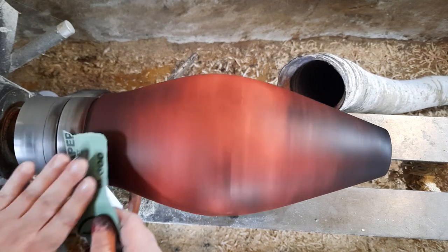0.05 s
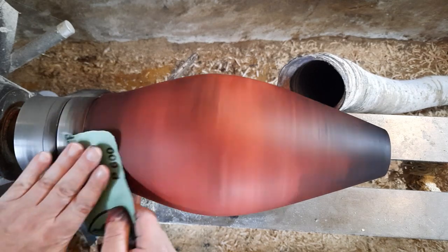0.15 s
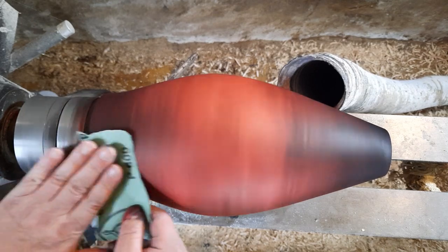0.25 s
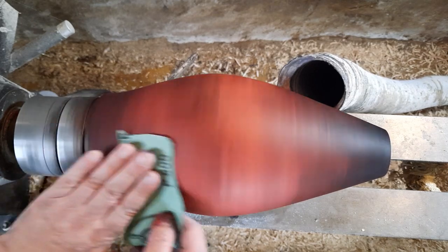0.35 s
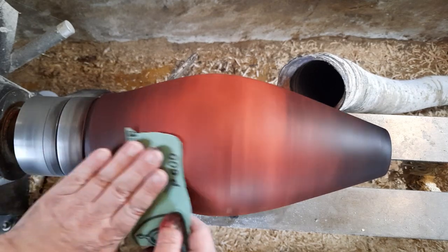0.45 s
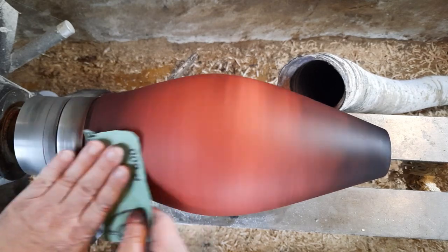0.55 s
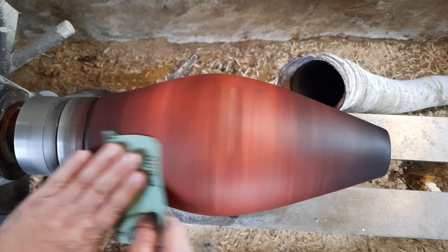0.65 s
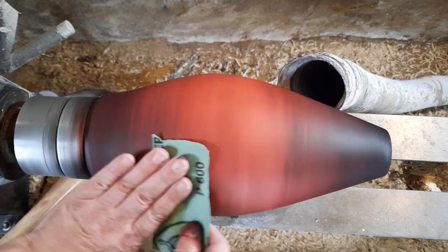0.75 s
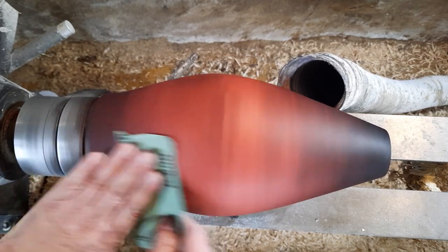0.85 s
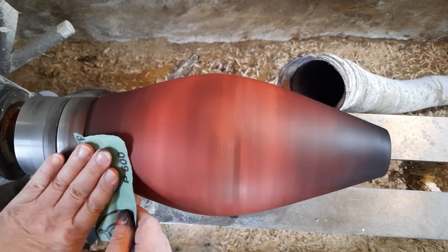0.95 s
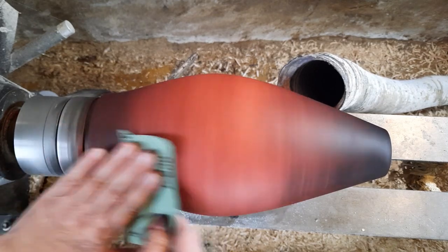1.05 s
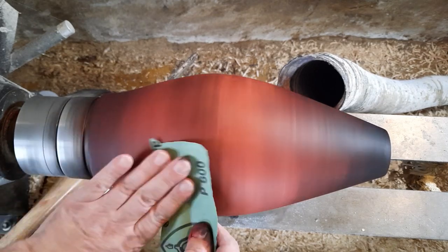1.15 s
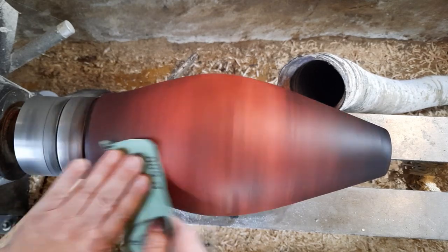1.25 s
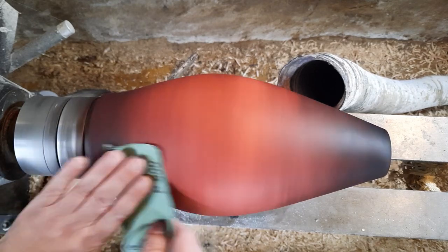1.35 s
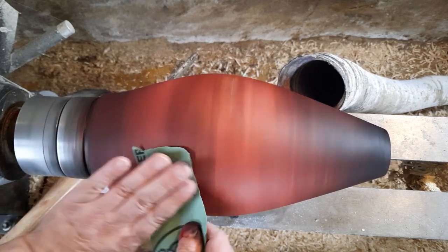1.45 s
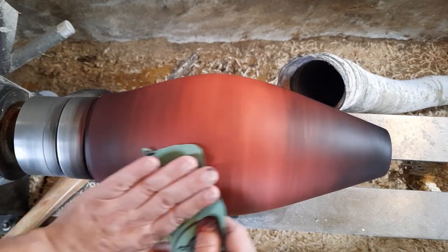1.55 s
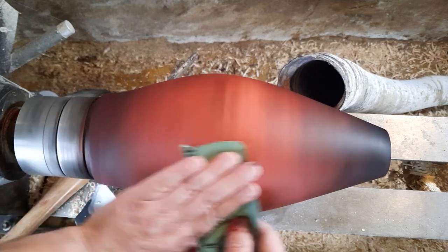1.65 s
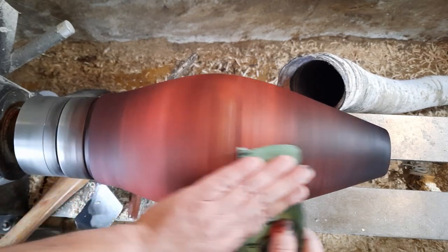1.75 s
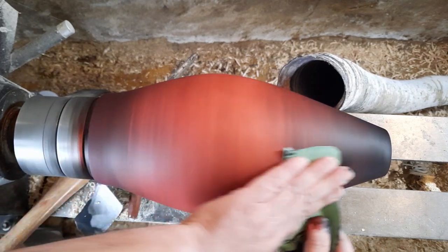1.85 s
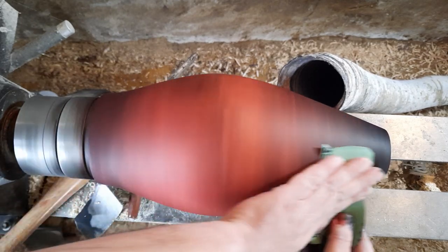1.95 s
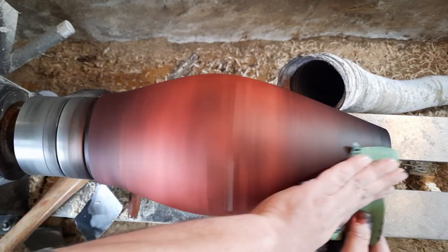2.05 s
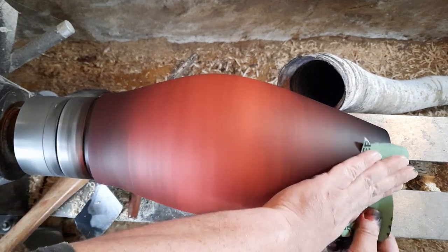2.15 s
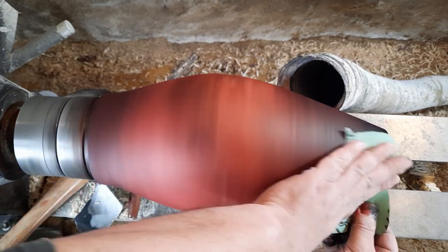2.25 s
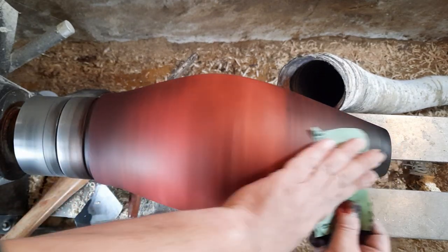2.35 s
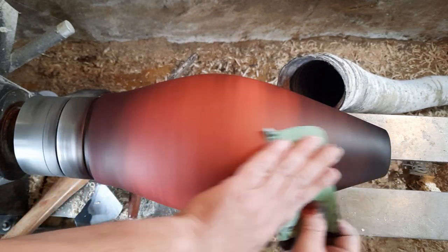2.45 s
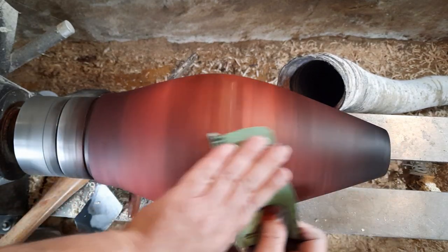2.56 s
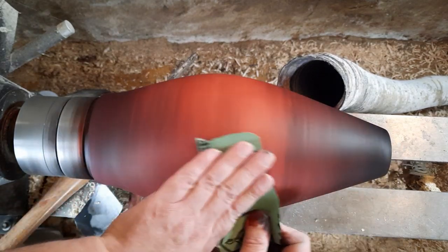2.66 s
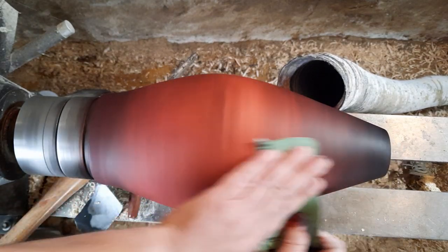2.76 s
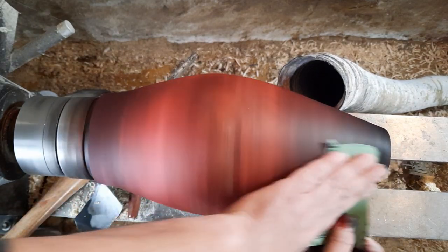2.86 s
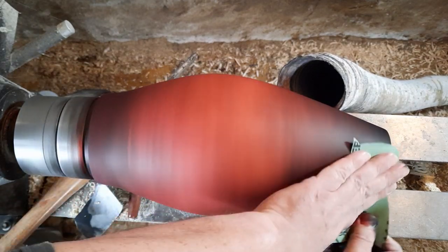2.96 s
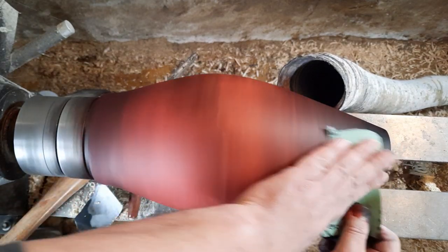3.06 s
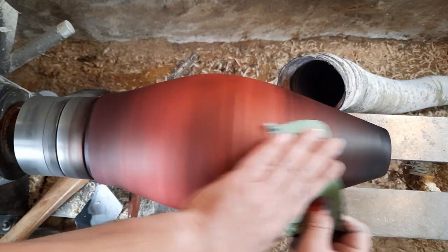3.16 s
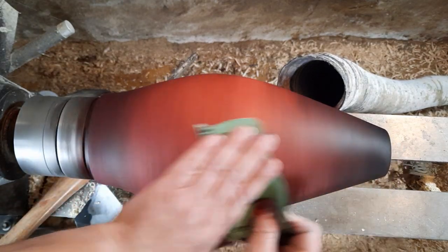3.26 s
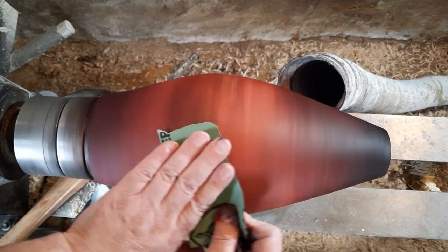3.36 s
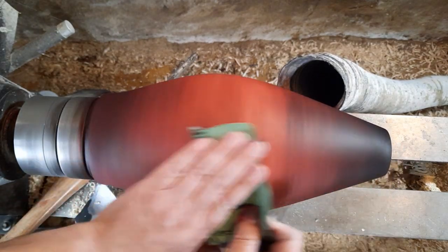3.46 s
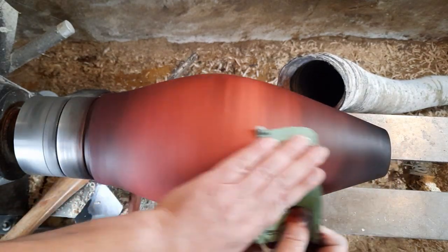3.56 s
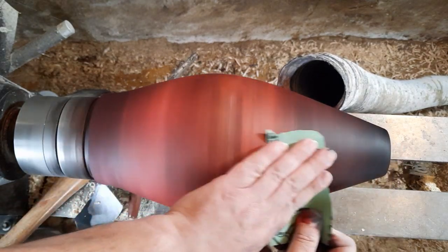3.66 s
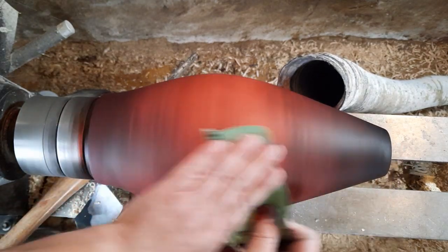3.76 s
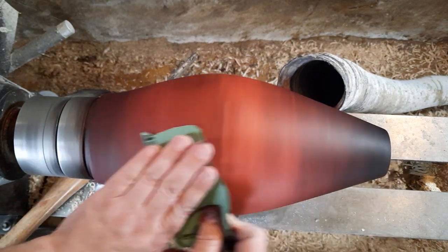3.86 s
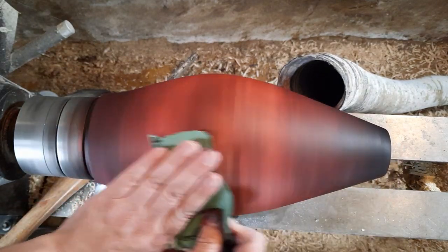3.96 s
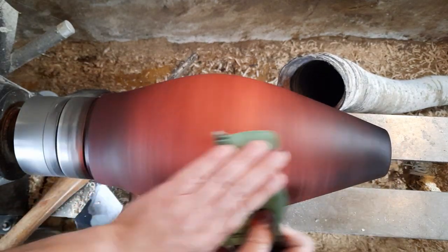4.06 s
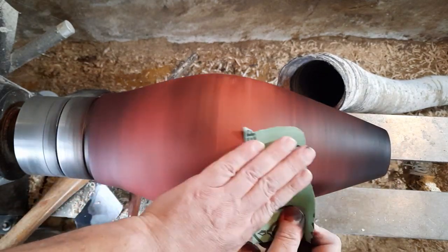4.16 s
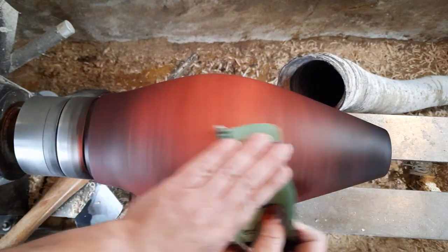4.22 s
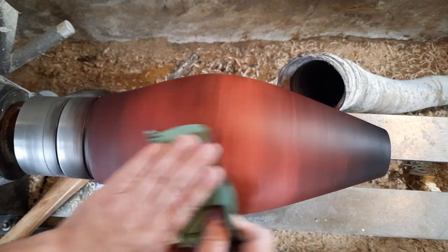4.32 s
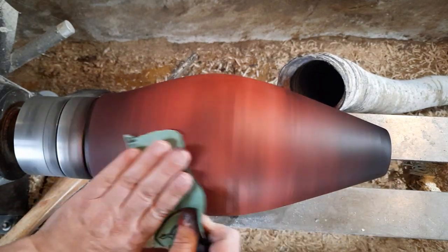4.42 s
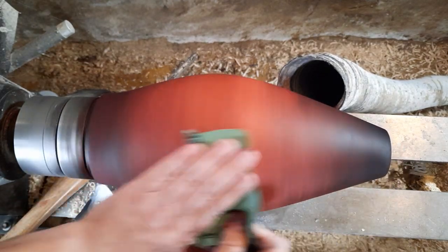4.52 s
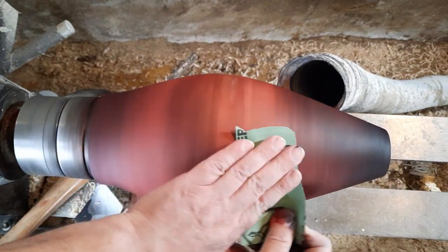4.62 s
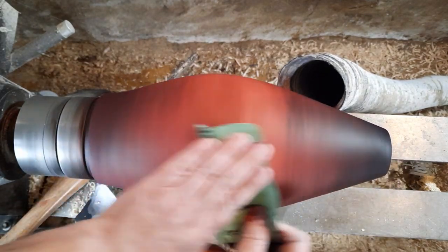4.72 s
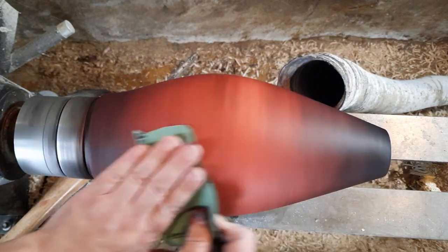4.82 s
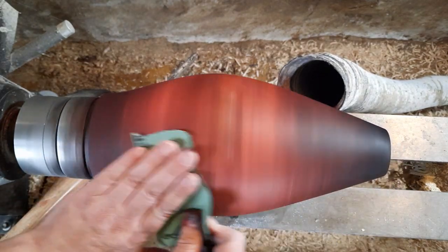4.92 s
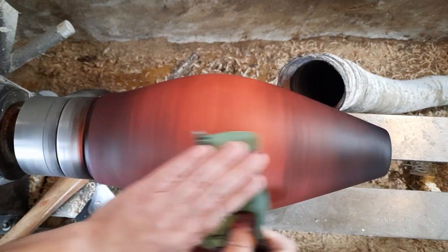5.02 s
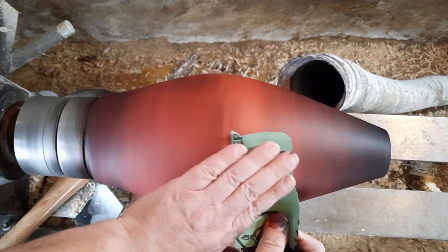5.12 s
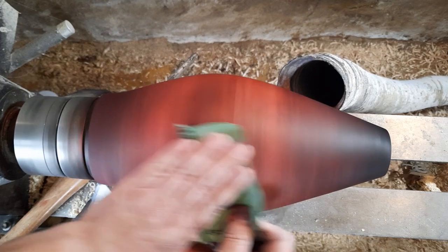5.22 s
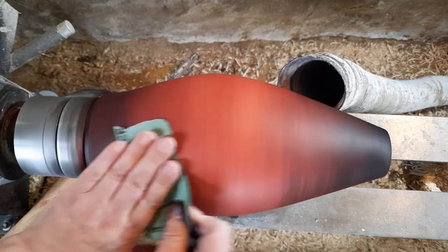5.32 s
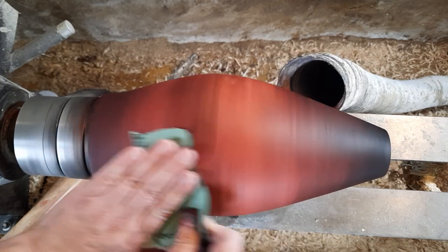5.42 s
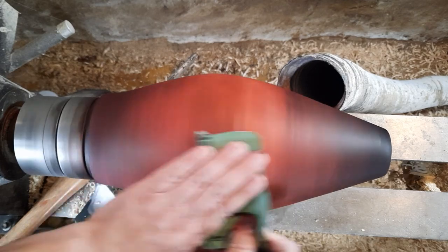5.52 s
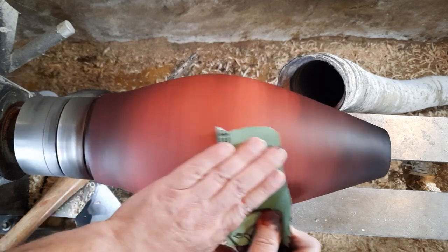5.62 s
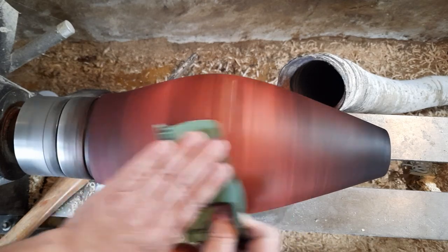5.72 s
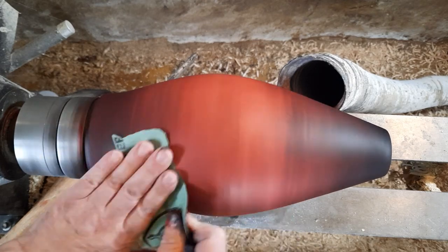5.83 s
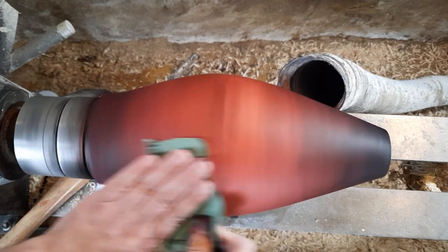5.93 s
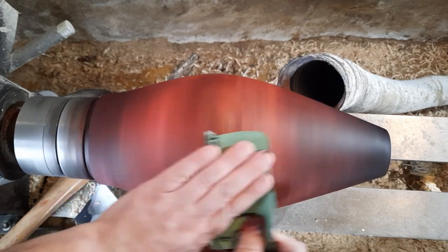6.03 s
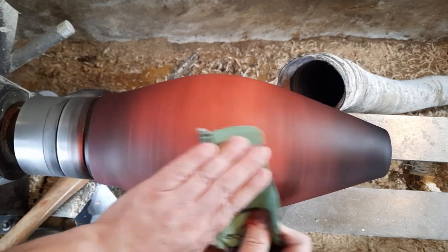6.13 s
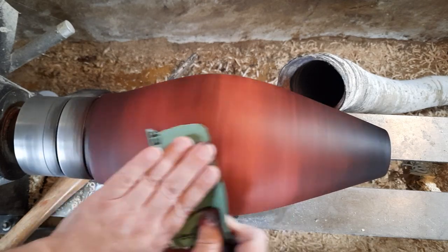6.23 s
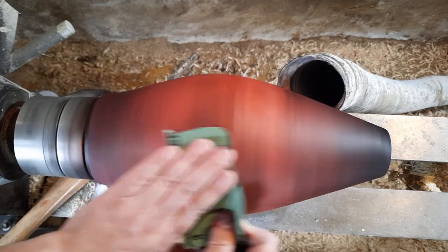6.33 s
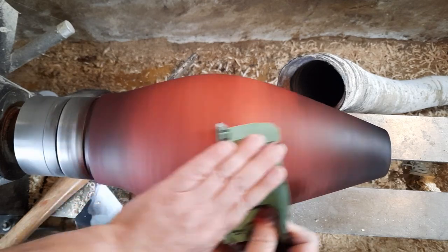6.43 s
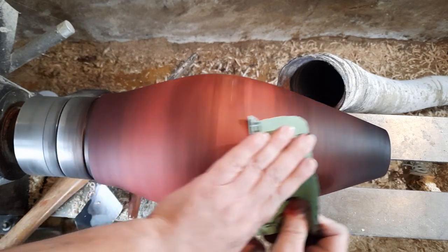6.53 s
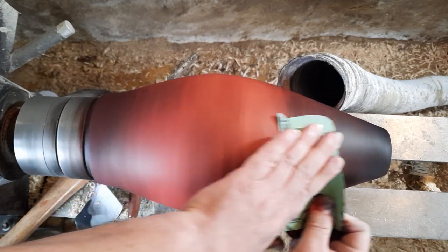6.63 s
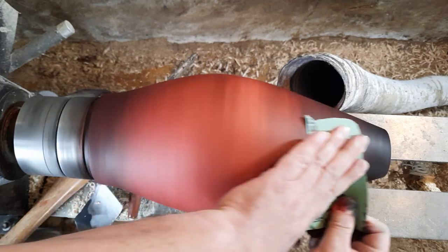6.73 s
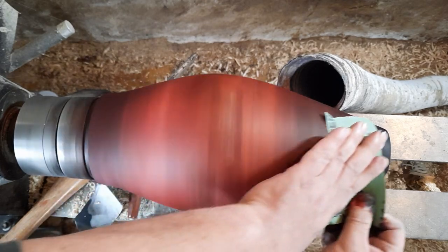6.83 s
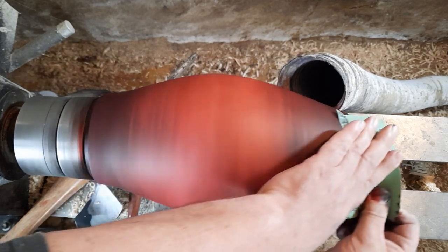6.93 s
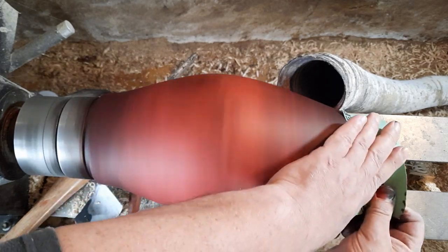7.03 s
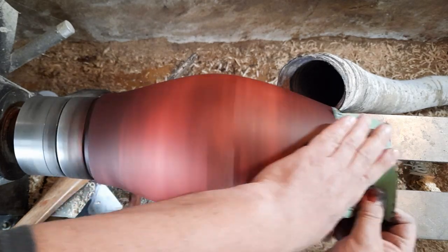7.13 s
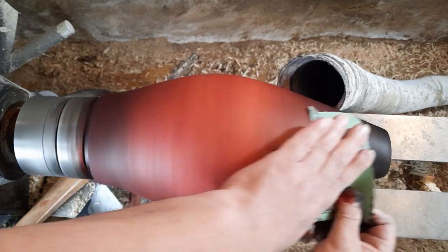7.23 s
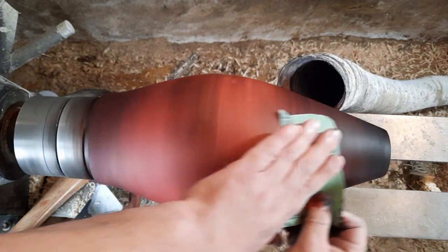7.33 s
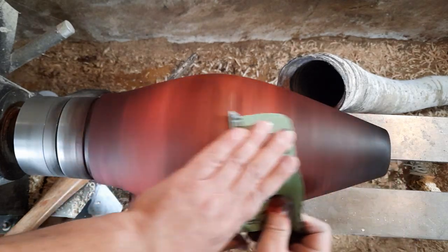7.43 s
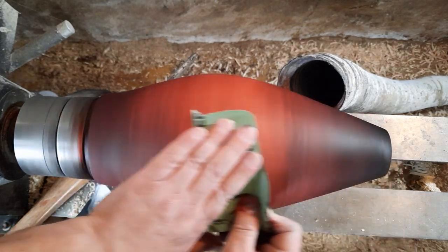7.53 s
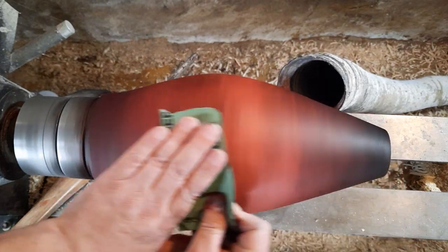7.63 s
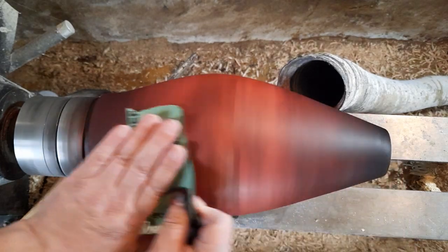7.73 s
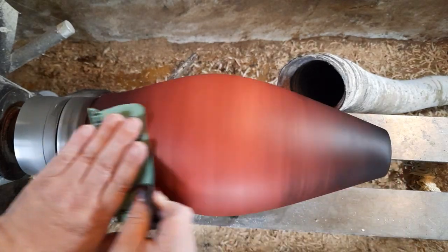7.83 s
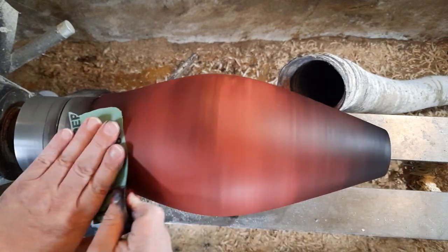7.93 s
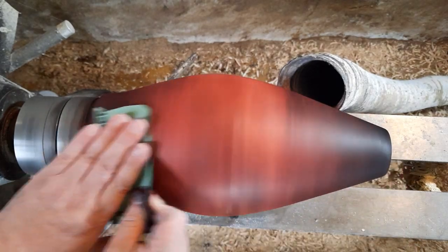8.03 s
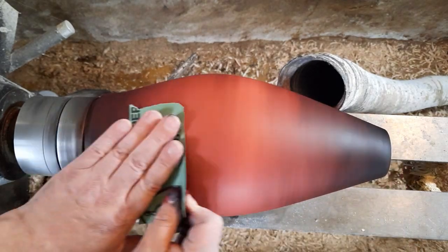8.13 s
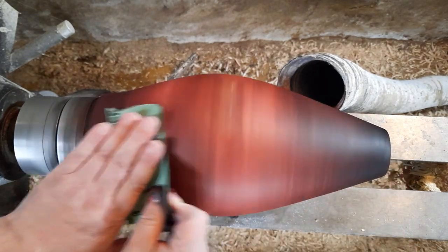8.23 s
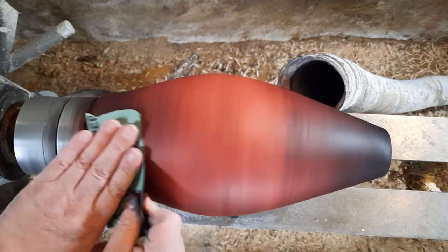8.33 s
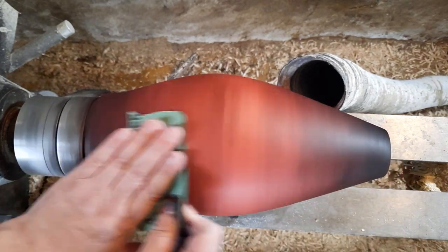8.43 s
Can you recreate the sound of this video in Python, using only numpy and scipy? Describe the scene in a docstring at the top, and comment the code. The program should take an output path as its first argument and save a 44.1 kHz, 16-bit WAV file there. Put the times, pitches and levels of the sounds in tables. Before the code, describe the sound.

A lathe runs up to speed with a brief whine, then hums and whistles faintly. Sandpaper hisses to and fro on a spinning hollow wooden vase, biting harder at one turn of each stroke. The sheet scuffs and snaps lightly against the wood, often with a soft low boom from the vase, and squeaks once near the end. The sound is close and slightly to the right, with the short echo of a small workshop.

```python
"""In a small workshop, a hand strokes sandpaper to and fro on a hollow wooden vase spinning on a lathe.
The lathe runs up to speed with a whine, then hums and whistles. The grit hisses as it cuts the wood,
biting at each inner turn of the stroke and easing at each outer one. The sheet scuffs, squeaks and snaps
against the vase, and the air inside booms softly. The room echoes the scuffs and snaps."""
import sys
import numpy as np
from scipy import signal
from scipy.fft import rfft, irfft, next_fast_len
from scipy.io import wavfile
from scipy.ndimage import uniform_filter1d, map_coordinates

SR = 44100
rng = np.random.default_rng(int(sys.argv[2]) if len(sys.argv) > 2 else 0)


def store_pcm(level_fs):
    """Save levels as 16-bit WAV."""
    pcm = np.round(np.clip(level_fs, -1, 1) * 32767).astype(np.int16)
    wavfile.write(sys.argv[1], SR, np.atleast_2d(pcm).T)


N = 373968
TIME = np.arange(N) / SR
SIDES = np.array([[.5], [-.5]])  # splits a difference between left and right

# Each to-and-fro of the sandpaper pad. A place is given as how late the sound arrives on the left.
# inner_turn_s, inner_place_samples, outer_turn_s, outer_place_samples, bite_db
STROKES = [(.32, -1.5, .46, -.5, 7.5), (.64, -3, 0.8, 0, 5), (.99, -3.5, 1.15, 0.5, -0.5),
           (1.27, -1, 2.2, 6, 1.5), (2.67, 4, 2.96, 9, 1.5), (3.43, 2.5, 4.04, 7, 3),
           (3.95, -1, 4.1, 6.5, 2), (4.44, -0.7, 4.68, 5, 4.5), (4.91, -0.3, 5.54, 5, 2.5),
           (5.39, -6, 5.64, 4, 4), (5.89, -1, 6.1, 4, 2), (6.29, 2, 7.53, 5, 1.5), (7.95, -2.5, 8.8, 0, 1),
           (8.4, -2, 8.4, 8, 2.5)]
# The sheet snaps against the wood (levels are relative): start_s, level_db, pitch_hz, boom_db, scuff_db
SNAPS = [(0.623, -31.5, 866, -75, -51), (1.292, -19, 1330, -68, -50), (1.432, -21, 1460, -70, -49),
         (1.7186, -5.5, 2650, -62, -56), (3.365, -20, 1200, -38, -40), (3.5294, -22.5, 1570, -47.5, -43),
         (3.8373, -18.5, 880, -43, -42.5), (4.0375, -27.5, 1170, -64, -39),
         (4.3128, -22.5, 990, -46.5, -41), (4.324, -22.5, 2280, -74, -55), (4.488, -32.5, 1190, -50, -44.5),
         (4.7867, -19, 890, -40, -37.5), (4.967, -36, 1190, -52, -47), (5.112, -26, 2000, -48.5, -43),
         (5.2614, -20, 780, -41.5, -41), (5.5844, -25, 1422, -49, -40), (5.737, -25.5, 1190, -46, -39.5),
         (6.0587, -27, 1410, -50.5, -40), (6.2135, -20, 1070, -36, -38.5), (6.3711, -26, 1310, -41, -42.5),
         (7.6165, -27, 1600, -62, -43), (7.6403, -23, 1080, -45.5, -38.5)]
# The hand's steady pressure, as relative levels: time_s, fizz_db, rasp_db, rub_db, rumble_db
PRESSURE = [(0, -63, -63, -68, -72), (.13, -50, -52.5, -66.5, -63.5), (.19, -40, -47, -69, -59),
            (.28, -36.5, -39.5, -55.5, -59.5), (1.1, -34, -39, -56.5, -63.5),
            (1.65, -39.5, -42.5, -55.5, -64), (1.95, -39, -40, -53, -60.5), (2.9, -39.5, -40.5, -51, -64.5),
            (3.2, -40.5, -41, -53, -62), (4.5, -41, -40, -50.5, -57.5), (6.15, -40.5, -40, -50, -59),
            (6.5, -43, -40.5, -48, -62), (7.2, -42.5, -43.5, -49, -65.5), (7.7, -41.5, -40.5, -49.5, -66),
            (8.48, -40.5, -41.5, -49.5, -62.5)]
# The notes at which the wall of the vase rings: pitch_hz, width_hz, boost_db
WALL_NOTES = [(349.4, 14, 6), (493.6, 18, 9.5), (760, 14, 5.5), (920, 38, 9), (1070, 45, 5), (1314, 25, 7),
              (1400, 27, 1.5), (1670, 30, 1.5)]


def amp(db):
    """Turn decibels into a gain."""
    return 10 ** (np.asarray(db) / 20)


def unit(x):
    """Scale to an average (rms) level of 1."""
    return x / np.sqrt(np.mean(x ** 2) + 1e-20)


def along(points, hz):
    """Read between (pitch, value) points on a log pitch scale."""
    pitches, values = np.transpose(points)
    return np.interp(np.log(hz + 1), np.log(pitches + 1), values)


def curves(rows):
    """One value per sample for each column after the time."""
    times, *columns = np.transpose(rows)
    return [np.interp(TIME, times, column) for column in columns]


def wobble(rate):
    """A smooth curve through `rate` random points a second."""
    return map_coordinates(rng.standard_normal(int(N * rate / SR) + 4), [TIME * rate])


def bump(s, half_length):
    """A bell curve of height 1 around time s."""
    return np.exp(-.5 * np.minimum(((TIME - s) / half_length) ** 2, 100))


def filtered(x, response):
    """Multiply each frequency f in x by response(f)."""
    n = x.shape[-1]
    padded = next_fast_len(n + 8192)
    return irfft(rfft(x, padded) * response(np.fft.rfftfreq(padded, 1 / SR)), padded)[..., :n]


def resonance(f, hz, width):
    """A ringing filter that passes a band around hz."""
    return 1j * f * width / (hz * hz - f * f + 1j * f * width)


def add(track, s, sound):
    """Mix a sound into a track at time s."""
    start = max(round(s * SR), 0)
    track[..., start:start + sound.shape[-1]] += sound[..., :N - start]


def placed(x, left_db, lag):
    """Make stereo: the left side is left_db louder and lag samples later than the right."""
    return filtered(x, lambda f: amp(SIDES * left_db) * np.exp(-2j * np.pi * f * SIDES * lag / SR))


def rush(colour, patchy_db, grain_db):
    """Stereo noise with drifting patches of tone colour and a fine grain."""
    # How alike the two sides are: pitch_hz, likeness
    likeness = [(50, 0.48), (200, 0.33), (800, 0.45), (1500, 0.23), (3000, 0.072), (8000, 0.3),
                (15000, 0.47)]
    # How much louder the left side is: pitch_hz, left_db
    balance = [(60, 0), (300, 7), (700, -4.5), (1300, -2.5), (3500, -2), (5700, -1), (7500, -3),
               (8900, -0.2), (10500, -6.5), (13000, -5.5), (15500, -3)]
    spectrum = signal.stft(rng.standard_normal((2, N)), nperseg=512)[2]
    patches = uniform_filter1d(uniform_filter1d(rng.standard_normal(spectrum.shape[1:]), 14, 0), 9, 1)
    pair = signal.istft(spectrum * amp(patchy_db * unit(patches)), nperseg=512)[1][:, :N]
    pair *= amp(grain_db * wobble(1500))
    spread = lambda f: np.arccos(np.clip(along(likeness, f), -1, 1)) / 2
    mid, side = filtered(pair, lambda f: colour(f) * np.array([np.cos(spread(f)), np.sin(spread(f))]))
    return unit(filtered(np.array([mid + side, mid - side]), lambda f: amp(along(balance, f) * SIDES)))


def drags(rows, breadth, grain_db):
    """Short swells of grainy noise, each around its own pitch."""
    out, t = np.zeros(N), np.arange(SR // 2) / SR - 1 / 4
    for s, db, hz, half_length in rows:
        grains = rng.standard_normal(len(t))
        grains *= amp(grain_db * np.repeat(rng.standard_normal(len(t)), repeats=40)[:len(t)])
        noise = unit(filtered(grains, lambda f: resonance(f, hz, breadth * hz) ** 2))
        swell = amp(db) * noise * np.exp(-.5 * (t / half_length) ** 2)
        add(out, s - 1 / 4, swell[max(round((1 / 4 - s) * SR), 0):])
    return out


def workshop(x):
    """The room's echo comes a little late, dies fastest in the treble and differs left and right."""
    # How long the echo takes to fall by 60 dB: pitch_hz, fade_s
    fade_times = [(150, 0.39), (1000, 0.15), (4000, 0.28), (12000, 0.03)]
    hz, t, spectrum = signal.stft(rng.standard_normal((2, SR // 2)), SR, nperseg=256)
    tail = signal.istft(spectrum * amp(-60 * t / along(fade_times, hz)[:, None]), SR, nperseg=256)[1]
    late = np.pad(x, (200, 0))
    return signal.fftconvolve(late[None], tail / np.linalg.norm(tail[0]), axes=1)[:, :len(x)]


def lathe(motor_slots=18, clock_hz=4000):
    """The lathe hums steadily; the motor's whine and the drive's whistles follow the speed."""
    # The electric drive runs up to speed: time_s, drive_hz
    run_up = [(0, 23.5), (.275, 29.2), (.5, 36.1), (.62, 38.7)]
    # The tones of the hum: pitch_hz, level_db
    hum_tones = [(50, -76.5), (108, -94), (149, -73), (216, -71.5)]
    # The motor whines loudest as it passes a resonance of the lathe: time_s, relative_db
    whine_levels = [(0, -77), (.12, -67.5), (.19, -58), (.225, -48), (.275, -45), (.3, -60), (.4, -62),
                    (.5, -66), (.6, -83)]
    # The drive's switching whistles: clock_multiple, drive_multiple, relative_db
    whistles = [(1, -3, -69.5), (2, -2, -57.5), (2, 0, -55), (2, 2, -72), (4, -8, -82)]
    (drive_hz,), (whine_db,) = curves(run_up), curves(whine_levels)
    drive_phase = 2 * np.pi * np.cumsum(drive_hz) / SR
    clock_phase = 2 * np.pi * clock_hz * TIME
    hum = sum(amp(db + 0.76 * wobble(6.9)) * np.sin(2 * np.pi * hz * TIME + 0.35 * wobble(5.5))
              for hz, db in hum_tones)
    whine = amp(whine_db + 2 + 3 * wobble(70)) * np.sin(motor_slots * drive_phase + .6 * wobble(70))
    whistle = np.zeros(N)
    for clock_multiple, drive_multiple, db in whistles:
        phase = clock_multiple * clock_phase + drive_multiple * drive_phase
        whistle += amp(db - 1 + 1.8 * wobble(26)) * np.sin(phase + 0.22 * wobble(40))
    return hum + whine + whistle


def spindle_rumble(jolt_db=-13, jolt_rise_s=0.07):
    """The shaft that turns the vase rumbles under the load, and each snap jolts it."""
    # The rumble's tone colour: pitch_hz, level_db
    colour = [(15, -27), (28, -27), (48, -5), (75, -0.5), (120, -1), (170, 2), (260, -3.5), (450, -6.5),
              (1000, -6), (4000, -45)]
    *_, rumble_db = curves(PRESSURE)
    jolt_power, age = np.zeros(N), np.arange(SR) / SR / jolt_rise_s
    for s, _, _, boom_db, _ in SNAPS:
        add(jolt_power, s, (amp(boom_db + jolt_db) * age * np.exp(1 - age)) ** 2)
    rumble = rush(lambda f: amp(along(colour, f)), patchy_db=2.6, grain_db=0.5)
    return rumble * np.sqrt(amp(rumble_db) ** 2 + jolt_power) * amp(1.4 * wobble(11))


def pad_place():
    """Where the pad is along the vase: it glides from turn to turn, slowing at each."""
    times, places = np.array(STROKES)[:, :4].reshape(-1, 2).T
    turns = np.arange(len(times))
    last_turn, progress = np.divmod(np.interp(TIME, times, turns), 1)
    return np.interp(last_turn + .5 - .5 * np.cos(np.pi * progress), turns, places)


def follow_pad(pair, left_db_per_sample=-0.23):
    """The sound travels with the pad: later and weaker on the farther side."""
    lag = pad_place()
    left_db = left_db_per_sample * (lag - lag.mean())
    return np.array([map_coordinates(x, [np.arange(N) - side * lag], order=5) * amp(side * left_db)
                     for x, side in zip(pair, (.5, -.5))])


def bed_echo(pair, delay_s=.0024, delay_per_place=3, gain=0.14, dull_hz=6000):
    """The lathe's base reflects the sound; the path changes with the hand, faintly sweeping the hiss."""
    late = np.arange(N) - delay_s * SR - delay_per_place * pad_place()
    echo = np.array([map_coordinates(x, [late], order=3) for x in pair])
    return pair + gain * filtered(echo, lambda f: 1 / (1 + (f / dull_hz) ** 4))


def vase_swells():
    """Low, soft swells from the vase, some of them the wood ringing just after a snap."""
    # Each swell: time_s, level_db, pitch_hz, half_length_s
    swells = [(.238, -53.5, 344, .021), (.345, -56, 340, .02), (.94, -59, 340, .025),
              (1.315, -49, 440, 0.026), (1.44, -58, 420, .012), (1.66, -58.5, 148, 0.046),
              (1.73, -53.5, 420, 0.017), (1.92, -54.5, 80, .035), (2.12, -63, 70, 0.1)]
    return drags(swells, breadth=0.67, grain_db=2.5)


def vase_booms(air_hz=147, rise_s=0.027, fade_s=0.26, rough_db=0.5):
    """After each snap the air in the vase swells and dies away, over a dull shudder of the wood."""
    out, t = np.zeros(N), np.arange(SR // 2) / SR
    wood = lambda f: .5 * resonance(f, 104, 16) + .6 * resonance(f, 176, 30) + .35 * resonance(f, 350, 60)
    for s, _, _, boom_db, _ in SNAPS:
        tone = np.sin(2 * np.pi * air_hz * (1 + 0.012 * rng.standard_normal()) * t)
        air = tone * (1 - np.exp(-t / rise_s)) ** 2 * amp(14.0 - 60 * t / fade_s)
        shudder = unit(filtered(rng.standard_normal(len(t)), lambda f: wood(f) / (1 + (f / 500) ** 4)))
        shudder *= (1 - np.exp(-t / 0.014)) * amp(-1.5 - 60 * t / 0.27)
        add(out, s, amp(boom_db) * (air + shudder))
    return out * amp(rough_db * wobble(45))


def rubbing():
    """The pad shakes the wall of the vase, which colours the noise with its own notes."""
    # The rub's tone colour before the wall rings: pitch_hz, level_db
    colour = [(150, -12), (300, -10), (600, -3), (900, -4), (1500, 1.5), (2500, 2.5), (3500, 3.5),
              (6000, -1.5), (12000, -61)]
    _, _, rub_db, _ = curves(PRESSURE)
    wall_db = lambda f: sum(db * abs(resonance(f, hz, width)) ** 2 for hz, width, db in WALL_NOTES)
    rub = rush(lambda f: amp(along(colour, f) + wall_db(f)), patchy_db=2.0, grain_db=0.0)
    return rub * amp(rub_db + 4 + 0.5 * wobble(25) + 0.63 * wobble(7))


def squeak():
    """The paper squeaks on the narrow neck of the vase."""
    # The parts of the squeak: time_s, level_db, pitch_hz, half_length_s
    parts = [(6.881, -46, 2750, .004), (6.888, -39, 3170, .007), (6.888, -37, 5600, 0.0088)]
    return drags(parts, breadth=0.19, grain_db=-6.0)


def scuffing(catch_hz=2600, settle_hz=2020):
    """The sheet drags just before each snap and again, more softly, as it settles."""
    # Its edge also scrapes now and then: time_s, relative_db, pitch_hz, half_length_s
    scrapes = [(1.567, -42, 9000, .004), (1.644, -41, 3040, .016), (2.88, -51, 3000, 0.027),
               (4.343, -41, 2700, .006), (4.755, -44.5, 3100, .015), (5.113, -36, 13000, .003),
               (5.29, -39.5, 2500, .008), (7.622, -36.5, 3020, 0.0088), (7.688, -40.5, 1500, 0.0066)]
    catches = [(s - .018, db, catch_hz, 0.016) for s, *_, db in SNAPS]
    settles = [(s + .02, db - 4.5, settle_hz, 0.011) for s, *_, db in SNAPS]
    return amp(-1) * drags(catches + settles + scrapes, breadth=3.8, grain_db=5.0)


def snapping(crackle_db=-8.5, crackle_fade_s=0.026, ring=0.52, room_db=-8.5):
    """The taut sheet slaps the wood: one pulse and a brief crackle of paper ring the wall of the vase."""
    out, t = np.zeros((2, N)), np.arange(SR // 3) / SR
    wall = lambda f: 1 + ring * sum((amp(db) - 1) * resonance(f, hz, width)
                                    for hz, width, db in WALL_NOTES)
    for s, db, hz, _, _ in SNAPS:
        # a slack sheet knocks for a few cycles, a taut one gives a single broad crack
        stiffness = (hz / 1000) ** 2
        sheet = lambda f: resonance(f, hz, 820 * stiffness) ** 2 + 0.5 * resonance(f, hz, 2 * hz)
        pulse = filtered(1. * (t == 0), sheet)
        crackle = unit(filtered(rng.standard_normal(len(t)), sheet))
        crackle *= amp(crackle_db - 60 * t / crackle_fade_s) / np.sqrt(stiffness)
        slap = amp(db + 2) * filtered(crackle - pulse / abs(pulse).max(), wall)
        add(out, s, placed(slap, left_db=-3.5, lag=0) + amp(room_db) * workshop(slap))
    return out


def grit_levels(ease_db=-1.05, rasp_share=0.37):
    """Fizz and rasp in dB: the grit bites at inner turns, eases at outer ones and follows the hand."""
    # The hand leans in (+) or lifts (-) for a moment: time_s, change_db, half_length_s
    leans = [(0.13, -5, .018), (.468, 3, 0.026), (.558, -1, 0.014), (1.2, -4.5, 0.027), (1.366, -9, 0.038),
             (1.44, 1, .015), (1.515, -14, 0.035), (2.881, 1.5, 0.025), (3.69, -1.5, .04),
             (4.32, -2.5, .015), (5.236, -0.3, 0.044), (7.066, -4.5, .035), (7.346, 2.5, 0.031),
             (7.796, 3.5, 0.037), (8.11, 2.5, 0.028), (8.21, 0, 0.022), (8.276, 4.5, 0.016)]
    fizz_db, rasp_db, _, _ = curves(PRESSURE)
    bite = sum(db * bump(inner_s, half_length=0.037) for inner_s, *_, db in STROKES)
    ease = ease_db * sum(bump(outer_s, half_length=0.035) for _, _, outer_s, _, _ in STROKES)
    weight = ease + sum(db * bump(s, half_length) for s, db, half_length in leans)
    return fizz_db + bite + weight, rasp_db + rasp_share * bite + weight


def sanding(split_hz=9500, coarse_hz=3970, bright_hz=13500, brighten=0.36):
    """Countless grains cut the wood: a rasp below and a fizz above, both fluttering."""
    # The grit's tone colour: pitch_hz, level_db
    colour = [(1200, -67), (2000, -16), (3000, -12.5), (4300, -5.5), (5600, -2), (7000, 0.5), (8100, 1.5),
              (8750, -3), (9400, -5.5), (10500, -2.5), (11700, 1.5), (13500, 3), (15800, -0.5)]
    grit = lambda f: amp(along(colour, f))
    above = lambda f, hz: 1 / (1 + (hz / (f + 1)) ** 14)
    fizz_db, rasp_db = grit_levels()
    flutter_db = .5 * wobble(30)
    fizz = rush(lambda f: grit(f) * np.sqrt(above(f, split_hz)), patchy_db=-0.3, grain_db=0.5)
    rasp = rush(lambda f: grit(f) * np.sqrt(1 - above(f, split_hz)), patchy_db=1.37, grain_db=1.07)
    # the rasp grows coarser towards the neck
    coarse_db = 0.63 * (pad_place() - 2.4)
    rasp += filtered(rasp, lambda f: 1 - above(f, coarse_hz)) * (amp(coarse_db) - 1)
    # the fizz grows brighter with pressure
    bright_db = brighten * np.maximum(fizz_db - np.median(fizz_db), -6)
    fizz += filtered(fizz, lambda f: above(f, bright_hz)) * (amp(bright_db) - 1)
    fizz *= amp(fizz_db + 6.0 + flutter_db + 0.64 * wobble(80))
    rasp *= amp(rasp_db + 3.0 + flutter_db)
    return fizz + rasp


def scene():
    """Lathe, vase and paper lie a little to the right of the listener."""
    scuffs = scuffing()
    paper = placed(scuffs + squeak(), left_db=-3.0, lag=0)
    friction = bed_echo(sanding() + rubbing() + spindle_rumble() + paper)
    vase = placed(vase_booms() + vase_swells(), left_db=-3.5, lag=1.5)
    machine = placed(lathe(), left_db=-4.5, lag=.3)
    return machine + vase + follow_pad(friction + snapping()) + amp(-0.5) * workshop(scuffs)


def record(dry):
    """Cut off the very highest treble."""
    top_hz = 15900
    return filtered(dry, lambda f: f < top_hz)


dry = scene()
out = record(dry)
store_pcm(out)
```